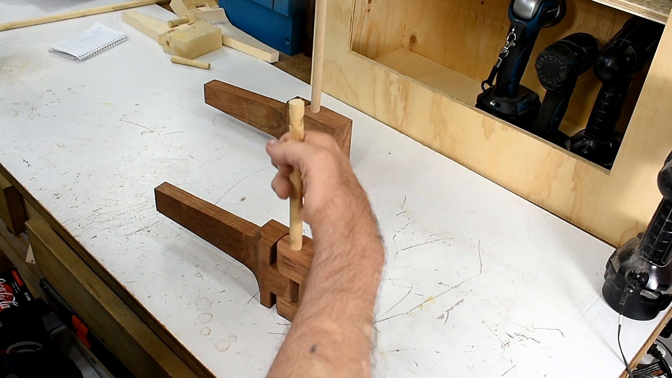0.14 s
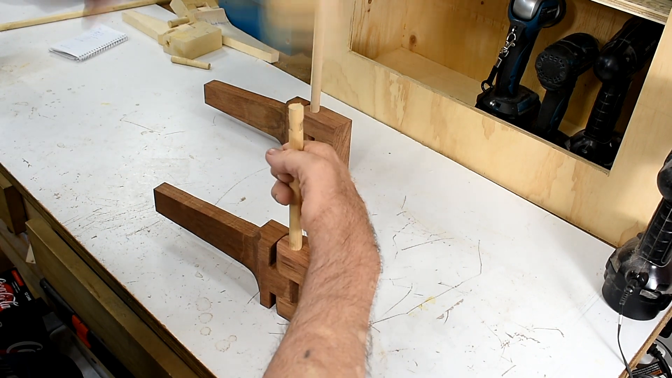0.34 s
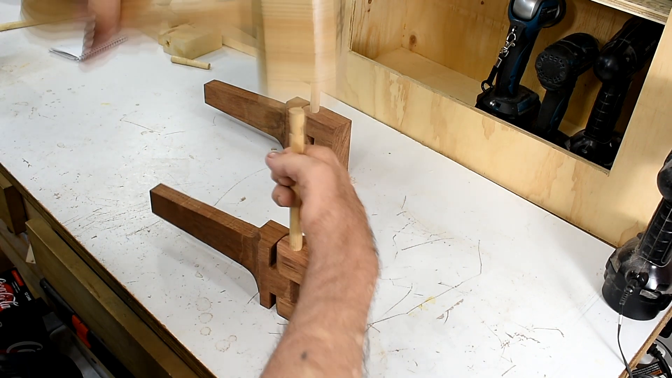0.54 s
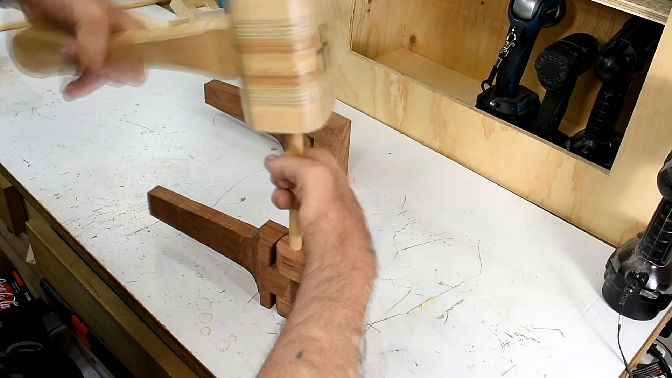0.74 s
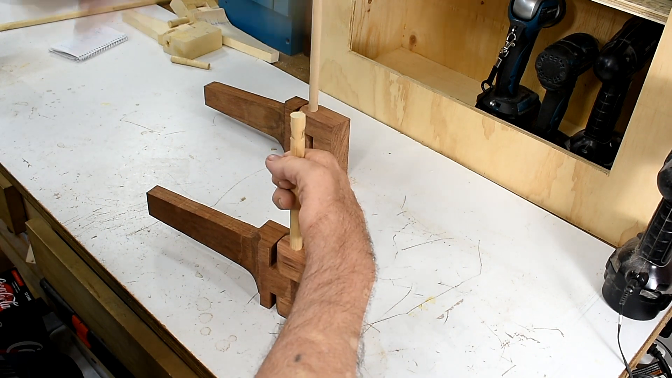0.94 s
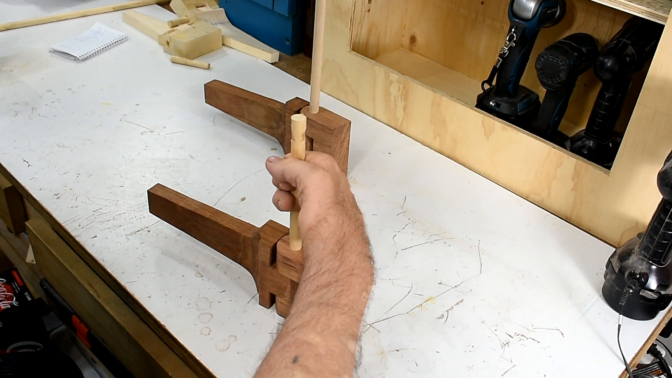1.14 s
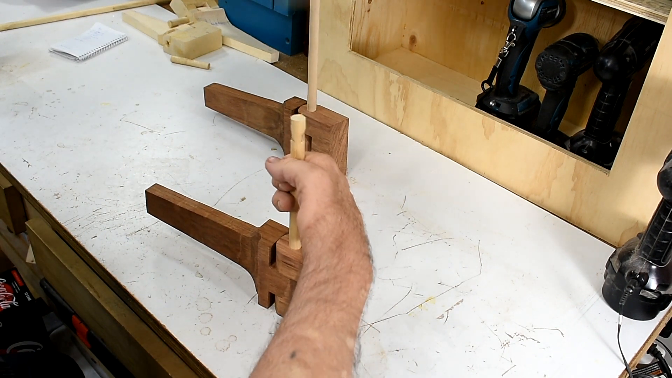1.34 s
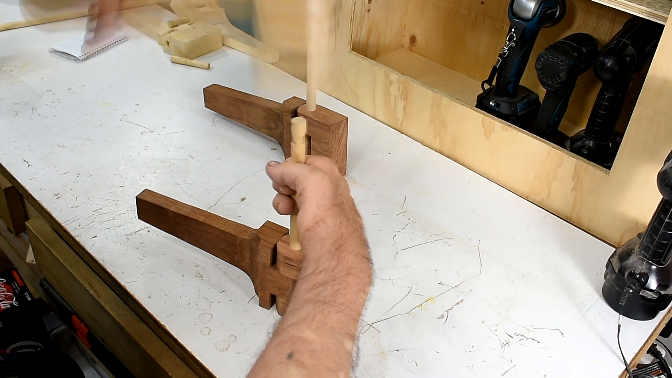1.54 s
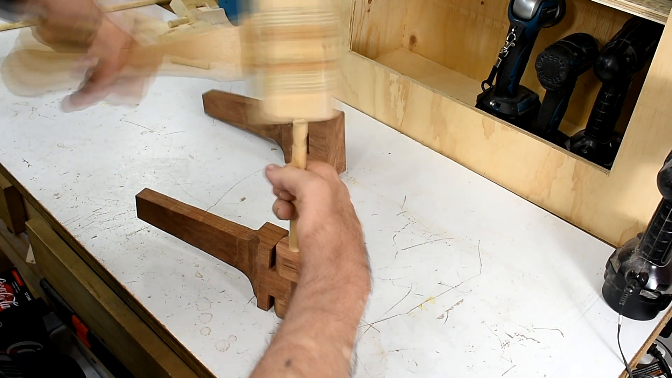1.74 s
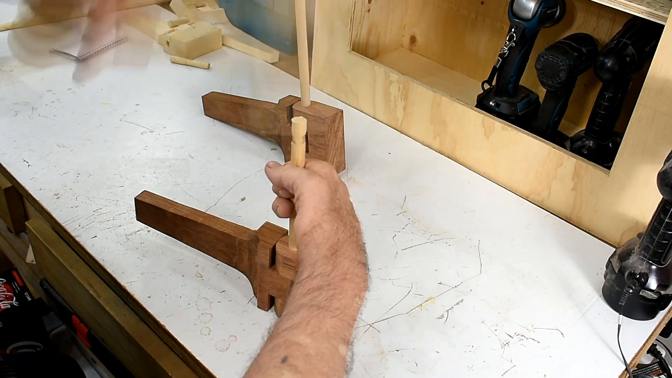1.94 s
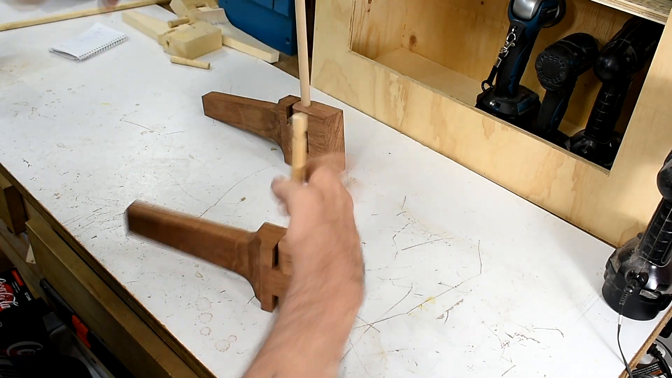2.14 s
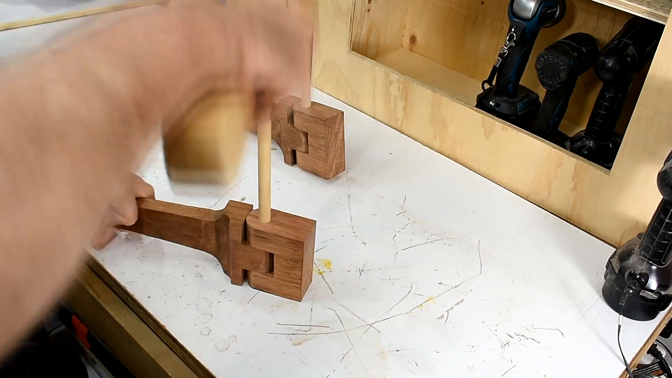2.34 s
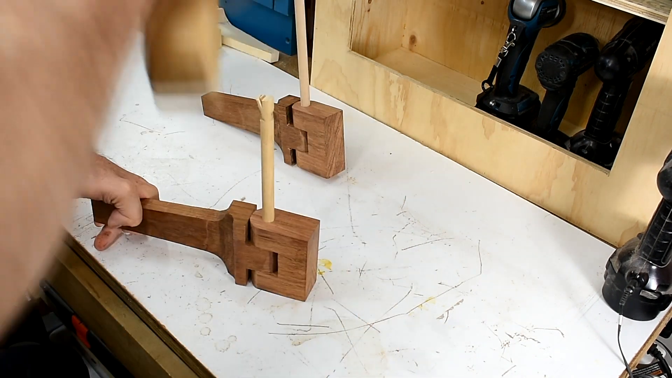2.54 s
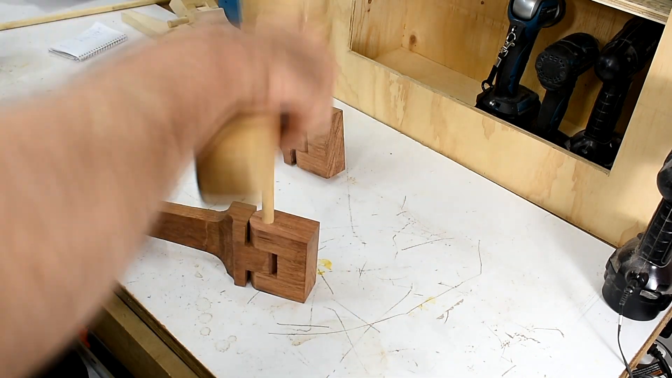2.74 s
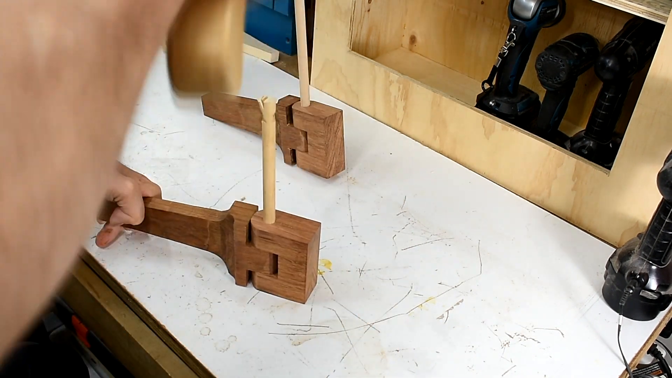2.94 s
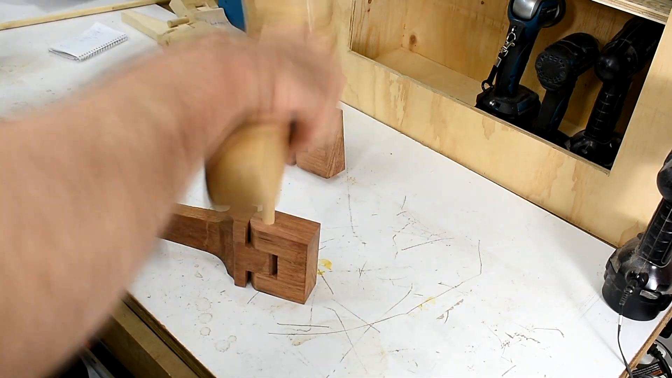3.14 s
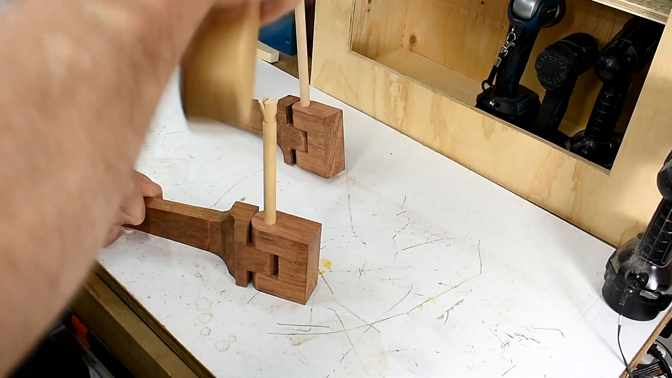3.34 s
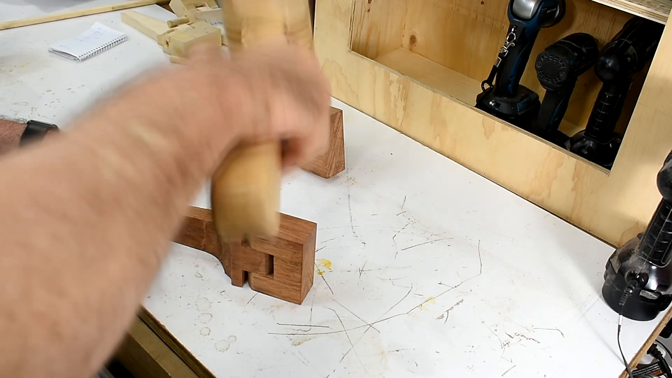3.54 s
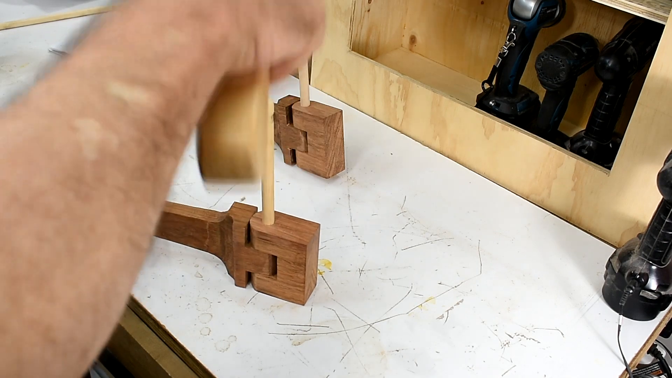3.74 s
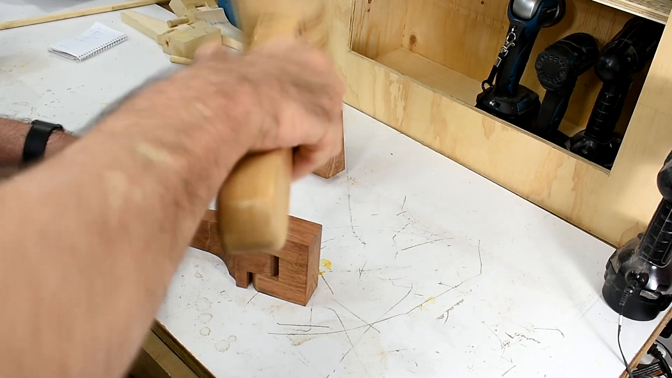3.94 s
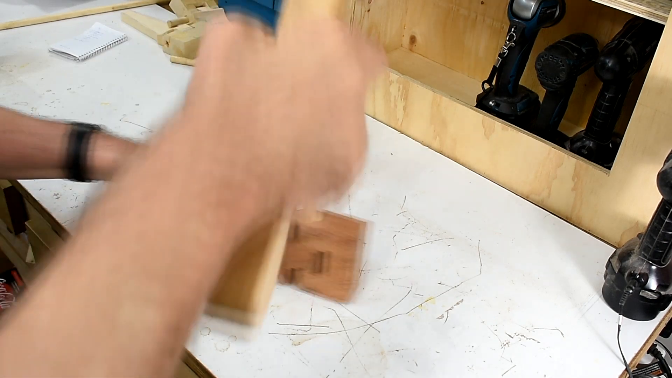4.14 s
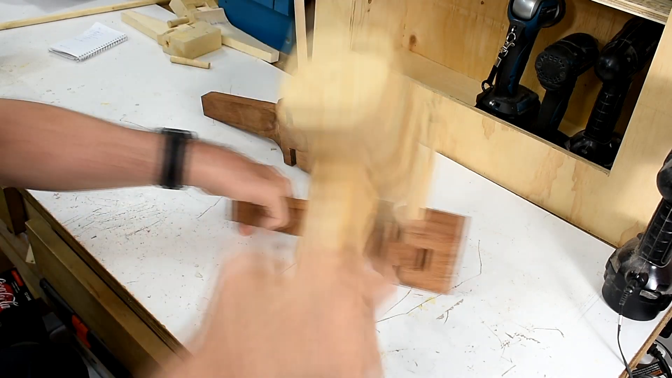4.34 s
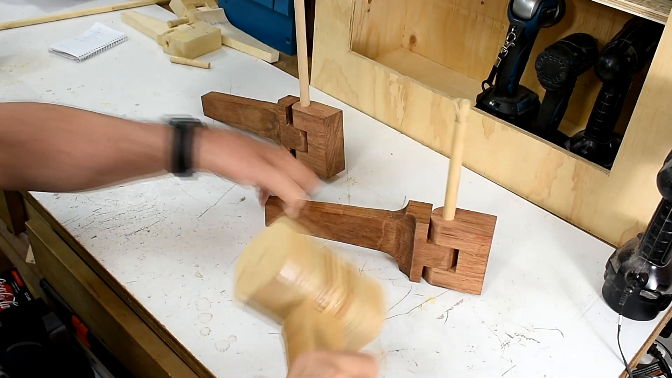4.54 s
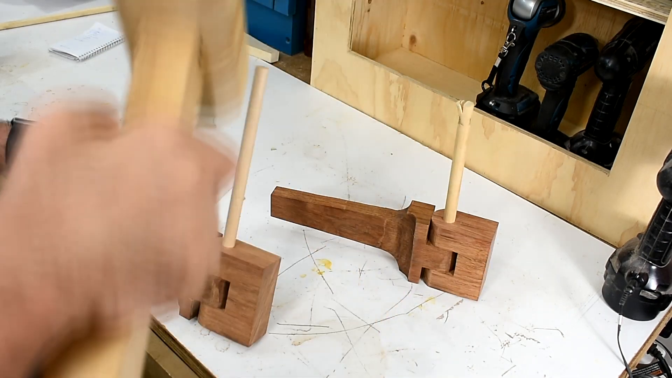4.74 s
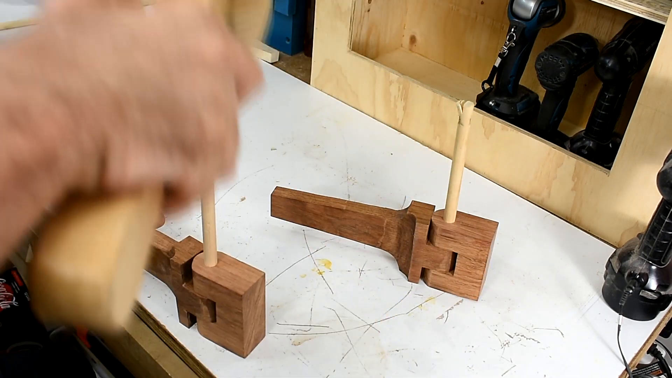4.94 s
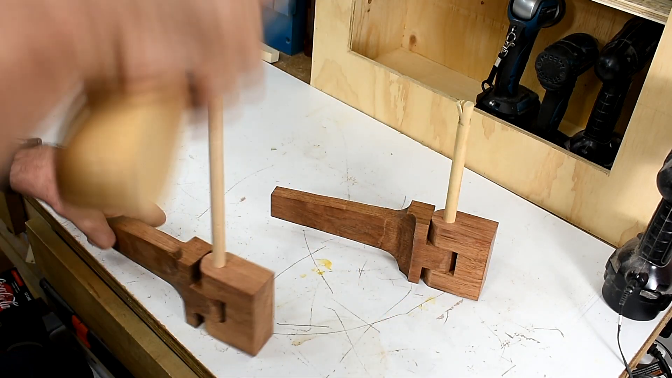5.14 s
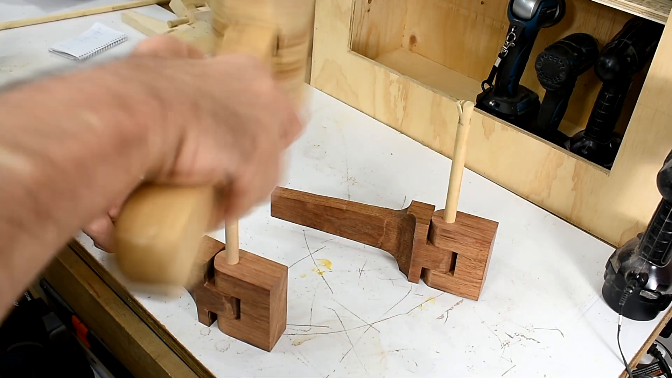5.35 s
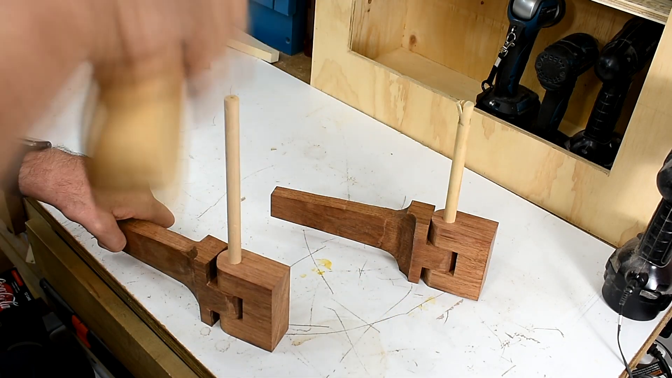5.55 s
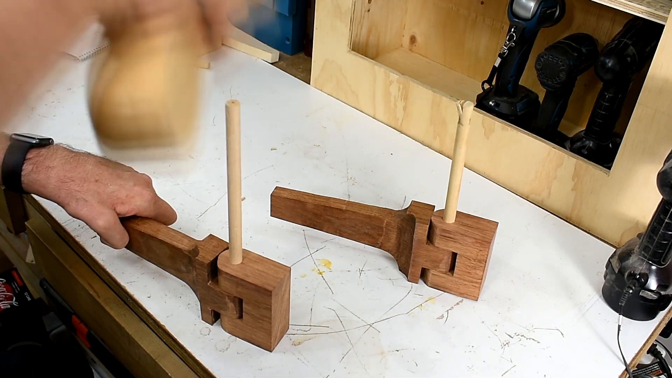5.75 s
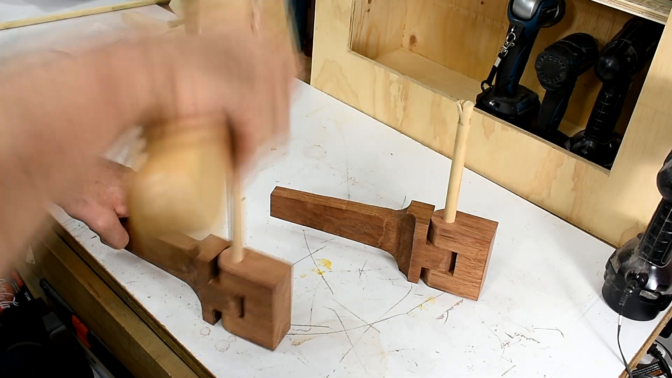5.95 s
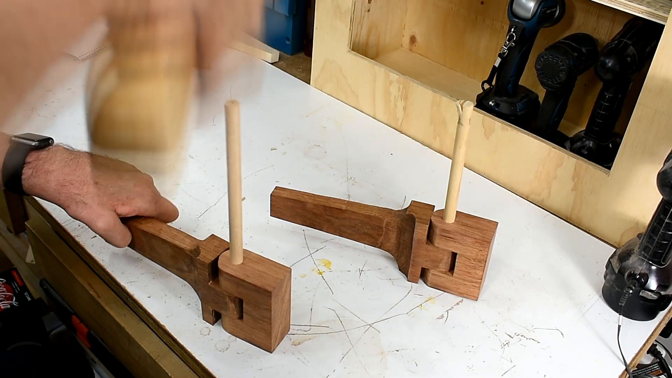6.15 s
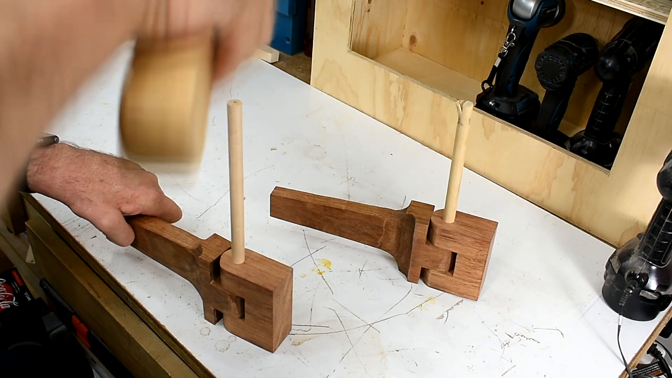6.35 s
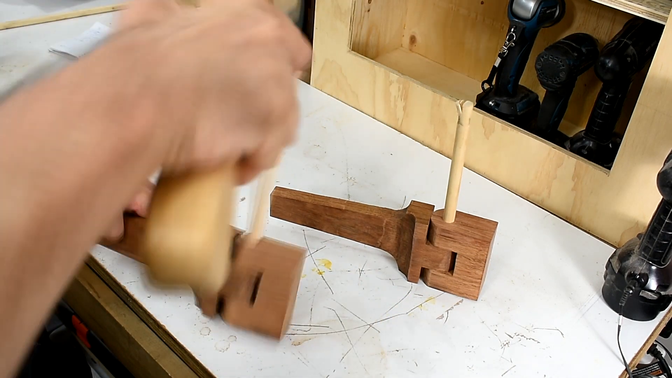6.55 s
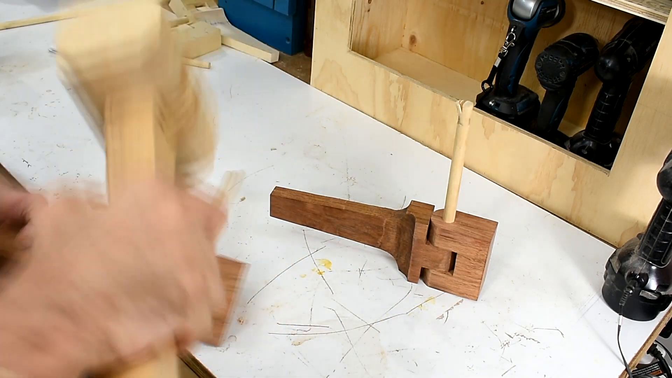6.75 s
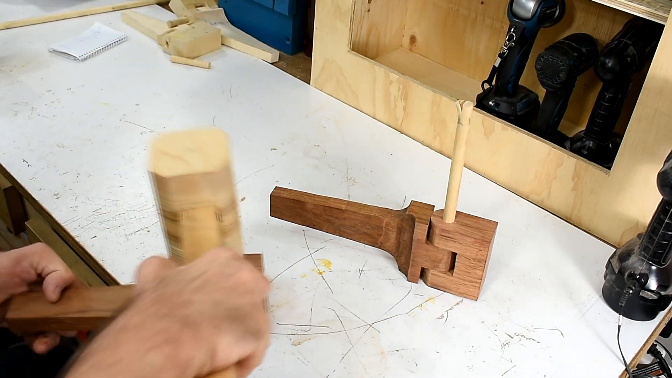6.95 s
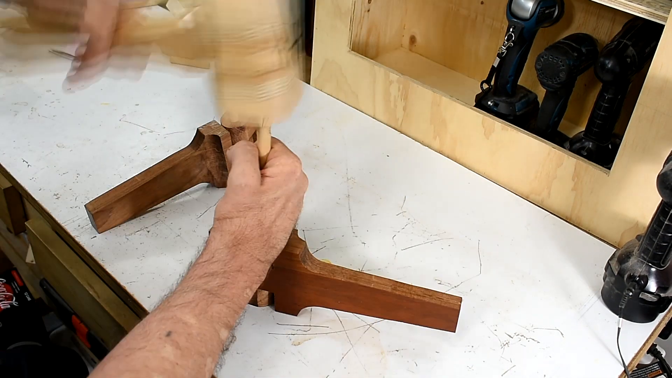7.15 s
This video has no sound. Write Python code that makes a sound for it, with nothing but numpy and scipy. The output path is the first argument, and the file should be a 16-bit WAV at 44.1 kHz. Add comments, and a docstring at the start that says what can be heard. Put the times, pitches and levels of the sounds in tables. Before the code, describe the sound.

Sharp wooden mallet blows come in three quick runs on a workbench, while loose dowels rattle and blocks slide.

```python
"""Three runs of mallet blows in a small workshop: a wooden mallet drives dowels into hardwood blocks on a
workbench. Each blow cracks, rings blocks, bench and room, and overloads a close microphone if loud. In between,
loose dowels rattle and wood is slid over the bench. Room air and a faint hum carry on."""
import sys
import numpy as np
from scipy import signal
from scipy.fft import rfft, irfft
from scipy.io import wavfile
from scipy.ndimage import uniform_filter1d

SR = 44100
rng = np.random.default_rng(int(sys.argv[2]) if len(sys.argv) > 2 else 0)


def log_audio(samples):
    """Write samples as a 16-bit WAV file to the path given in sys.argv[1]."""
    # one column per channel
    frames = np.atleast_2d(samples).T
    # limit to full scale, then quantise
    limited = np.clip(frames, -1, 1)
    pcm = np.round(limited * 32767).astype(np.int16)
    wavfile.write(sys.argv[1], SR, pcm)


N = 317079
RING = int(.6 * SR)  # samples per blow or contact
AGE_S = np.arange(RING) / SR
TIME_S = np.arange(N) / SR


def undb(db):
    """Decibels to gain."""
    return 10 ** (np.asarray(db) / 20)


def unit(x):
    """Scale to rms 1."""
    return x / np.sqrt(np.mean(x ** 2))


def fade(t60_s):
    """Free decay, 60 dB down after t60_s."""
    return np.exp(-np.log(1000) * AGE_S / max(t60_s, 1e-3))


def rise(tau_s):
    """Exponential build-up to 1."""
    return 1 - np.exp(-AGE_S / tau_s)


def bins_hz(x):
    """Frequencies of the spectrum of x."""
    return np.maximum(np.arange(len(x) // 2 + 1) * SR / len(x), 1)


def colour(x, points):
    """Filter by a spectrum of (Hz, dB) points."""
    hz, db = np.transpose(points)
    return irfft(rfft(x) * undb(np.interp(np.log(bins_hz(x)), np.log(hz), db)), len(x))


def noise(count, points):
    """Coloured noise, rms 1."""
    return unit(colour(rng.standard_normal(count), points))


def add(track, start_s, sound):
    """Mix a sound into a track."""
    start = max(int(start_s * SR), 0)
    part = sound[:max(N - start, 0)]
    track[start:start + len(part)] += part


def workshop():
    """Quiet room air, lowest while the hands are still, and a faint steady hum."""
    # Each row: frequency in Hz, rms level in dB.
    hum_tones = [(100, -86.5), (167, -75)]
    # Each row: frequency in Hz, spectral density in dB.
    air_spectrum = [(25, -7.5), (60, -1), (150, -3), (400, -11), (900, -9.5), (1500, -12.5), (3000, -18.5),
                    (5000, -20), (10000, -31), (16000, -44.5)]
    # Each row: time in seconds, level in dB.
    air_levels = [(0, -64), (2.2, -63), (4.6, -65), (4.95, -70), (5.07, -70.5), (5.2, -63), (6.9, -55.5),
                  (7.1, -68), (7.19, -73)]
    hum = sum(np.sqrt(2) * undb(db) * np.sin(2 * np.pi * hz * TIME_S) for hz, db in hum_tones)
    return hum + undb(np.interp(TIME_S, *np.transpose(air_levels))) * noise(N, air_spectrum)


def sliding(gain_db=5, grain_db=1.5):
    """Wood slid over the bench hisses and catches unevenly."""
    # One list per slide. Each point: time in seconds, level in dB.
    slides = [
        [(4.2, -76), (4.254, -58), (4.266, -85), (4.276, -53), (4.334, -56.5), (4.454, -57), (4.54, -82),
         (4.56, -91)],
        [(4.69, -87), (4.704, -80), (4.752, -70), (4.804, -74.5), (4.856, -71), (4.86, -85.5)],
        [(5.14, -85.5), (5.212, -69), (5.222, -71), (5.262, -64), (5.304, -71), (5.32, -77)],
        [(6.85, -73), (6.86, -72), (6.878, -80), (6.932, -58.5), (7.008, -63), (7.06, -84.5)],
    ]
    # Each row: frequency in Hz, level in dB.
    friction_spectrum = [(100, -20), (200, 4), (450, 7), (900, 8), (1600, 8.5), (3000, 3.5), (5000, -0.5),
                         (9000, -2.5), (12000, -6), (16000, -18)]
    effort = sum(np.interp(TIME_S, s, undb(db), left=0, right=0) for s, db in map(np.transpose, slides))
    effort = uniform_filter1d(effort, size=600)
    catch = unit(uniform_filter1d(rng.standard_normal(N), size=300))
    return noise(N, friction_spectrum) * effort * undb(gain_db + grain_db * catch)


def shimmer(depth=.7):
    """Reflections make a ringing mode swell and shift phase at random."""
    slow = uniform_filter1d(rng.standard_normal((RING, 2)) @ [1, 1j], size=600)
    wobble = 1 + depth * slow / np.std(slow)
    return wobble / np.sqrt(1 + depth ** 2)


def rattles(contact_t60_s=.025, room_db=-16, room_t60_s=.33, bounce_db=-6, modes_db=-5, pick_db=9,
            bench_db=-16, bench_t60_s=.15, grip_hz=35):
    """A loose dowel bounces on a block: each contact clicks, rings the dowel and nudges the bench."""
    # Each row: start in seconds, level in dB, chatter in seconds, thud in dB, treble in dB,
    # favoured ring in Hz.
    taps = [ (0.002, -48, 0.023, -5, -2, 2420), (0.222, -36.5, 0.017, -9, -2, 2400),
            (0.4585, -37.5, 0.021, -3, 0, 2180), (0.696, -36.5, .03, -5, -2, 2370),
            (0.9385, -34, .035, -10, -1, 2350), (1.185, -39.5, 0.012, -3, -0.5, 2350),
            (1.195, -37.5, 0.05, -5, 2, 2290), (1.433, -33.5, 0.0019, -5, 2, 2340),
            (1.458, -44, .01, 5, 0, 2410), (1.6605, -40, .03, 3, -1.5, 2350),
            (1.736, -44.5, .005, -3, 0, 2370), (1.924, -39, 0.029, 0, 5.5, 2370),
            (2.26, -39, .002, -3, 1, 3150), (2.294, -49, 0.0082, -3, 2.5, 3170),
            (2.331, -47, .004, 0, 4, 3100), (2.555, -39.5, 0.034, 2, -1, 2350),
            (2.668, -40, 0.0022, -3, -8, 3140), (2.945, -32.5, 0.039, -5, -5.5, 2450),
            (3.3772, -38.5, 0.018, -16, -2.5, 2460), (3.4514, -43, 0.012, -5, -2, 2360),
            (3.7735, -31.5, 0.025, -12, -4.5, 2340), (4.0708, -37.5, 0.0019, -5, 1, 3150),
            (4.2019, -47.5, 0.0042, 13, 1, 3150), (4.291, -37, 0.009, -3, -2, 2300),
            (4.3288, -51, 0.0053, -3, -3, 2380), (4.353, -44.5, 0.0032, -10, -10, 2380),
            (4.4286, -42, 0.0037, -11, -12, 3000), (4.576, -56, 0.0038, 18, -4, 2400),
            (4.6032, -33.5, 0.0043, -9, 2, 3120), (4.633, -45.5, 0.026, -3, -6, 2420),
            (4.7072, -57, 0.002, 6, 6, 3150), (4.790, -60, 0.0096, 19.5, 6.5, 2400),
            (4.834, -62.5, 0.0048, 6, 0, 2420), (4.8732, -42, 0.027, 23.5, 8, 3090),
            (4.95, -49, .008, 6, -5, 3150), (5.0995, -50.5, .008, -9, -3, 3050),
            (5.211, -52, .01, 5, -4, 2350), (5.241, -35, .01, -2.5, -29, 3000),
            (5.274, -40.5, .025, -16, -16, 3100), (5.335, -46, 0.014, -3, -8, 3080),
            (5.3493, -25, 0.0011, -24, -3, 2370), (5.3675, -17, .001, 7.5, 7, 2780),
            (5.4203, -27.5, 0.0021, 3, 1.5, 3130), (5.550, -36.5, .008, -3, -17, 2340),
            (5.578, -37.5, 0.012, -11, -18, 2300), (5.764, -34.5, 0.0059, 0, 3.5, 3100),
            (5.8207, -33.5, 0.016, -7, -7, 2300), (6.1076, -33.5, 0.042, -10, -9, 2450),
            (6.1755, -46.5, .004, -9, -9, 3150), (6.387, -30, 0.027, -9, -8, 2390),
            (6.735, -32.5, 0.0037, 4, -4, 2350), (6.7599, -31, 0.021, 11.5, 6, 2460),
            (6.819, -45, 0.0058, 11, -7, 1510), (6.951, -57, 0.013, 28.5, 0, 2410),
            (7.0052, -42.5, 0.004, 14.5, -18, 2400), (7.156, -52, 0.011, 8, 5.5, 2400)]
    # Lightly held dowel. Each row: frequency in Hz, level in dB, t60 in seconds.
    dowel_modes = [(874, -11, .15), (1480, -7.5, 0.12), (1600, -11, .08), (2080, -7.5, .12),
                   (2290, -6, 0.15), (2425, -7.5, 0.14), (2760, -10.5, 0.13), (3070, -7.5, 0.081),
                   (3165, -8, 0.12)]
    # Contact click and bench thud. Each row: frequency in Hz, level in dB.
    click_spectrum = [(60, -22.5), (180, -13.5), (500, -7), (900, -2), (1500, 3.5), (2300, 4.5),
                      (3200, -0.5), (4000, -6), (6500, -16), (11000, -29), (16000, -41.5)]
    thud_spectrum = [(40, -20), (90, -6), (160, -3.5), (330, -2), (480, -17.5), (1500, -39), (5000, -69.5)]
    out = np.zeros(N)
    mode_hz, mode_db, _ = np.transpose(dowel_modes)
    modes = np.array([np.exp(2j * np.pi * hz * AGE_S) * fade(t60_s) for hz, _, t60_s in dowel_modes])
    for start_s, level_db, chatter_s, thud_db, treble_db, ring_hz in taps:
        # the contact point favours modes near one pitch; the grip shifts them from tap to tap
        dowel = undb(mode_db + pick_db / (1 + ((mode_hz - ring_hz) / 200) ** 2)) @ modes
        dowel *= np.exp(2j * np.pi * grip_hz * rng.standard_normal() * AGE_S)
        tilt = [(3200, .02), (6000, treble_db), (11000, 2.1 * treble_db)]
        bounces_s = chatter_s * (np.arange(3) + rng.uniform(.6, 1, 3)) / 3
        for delay_s, contact_db in [(.0011, 0)] + [(s, bounce_db) for s in bounces_s]:
            click = colour(noise(RING, click_spectrum), tilt)
            click *= fade(contact_t60_s) + undb(room_db) * fade(room_t60_s)
            # a block that lands heavily hardly rings its dowel
            ring = undb(modes_db - .47 * max(thud_db, 0)) * (dowel * shimmer()).real
            thud = noise(RING, thud_spectrum) * fade(bench_t60_s) * rise(.005)
            contact = (click + ring + undb(bench_db + thud_db) * thud) * rise(.00021)
            add(out, start_s + delay_s, undb(level_db + contact_db) * contact)
    return out


def ripple(x, depth_db=3.5, spacing_hz=100):
    """Countless small resonances raise and lower neighbouring frequencies at random."""
    hz = bins_hz(x)
    heights = rng.standard_normal(2000)
    db = depth_db * np.interp(hz / spacing_hz, np.arange(len(heights)), heights) * hz / (hz + 1200)
    return irfft(rfft(x) * undb(db), len(x))


def room_decay(x, t60_s, low_hz=450, high_hz=6000):
    """Three-band decay: the bass builds up late, the treble dies first."""
    spectrum, hz = rfft(x), bins_hz(x)
    low = irfft(spectrum / (1 + (hz / low_hz) ** 4), RING)
    high = irfft(spectrum / (1 + (high_hz / hz) ** 4), RING)
    mid = x - low - high
    return low * fade(.86 * t60_s) * rise(.0039) + mid * fade(t60_s) + high * fade(.65 * t60_s)


def mallet(wash_db=-3, crack_db=2, crack_t60_s=.05, scatter_db=1.5, detune=.004):
    """Each blow: a short crack of head on dowel, then modes and dense ringing of bench and room."""
    # Each row: start in seconds, level in dB, mid-band t60 in seconds, lead-in in seconds, then
    # lead-in, bench thud, block knock and dowel crack in dB.
    blows = [ (0.0515, -17.5, 0.19, .010, -1.5, 0, -0.5, 4.5), (0.2865, -13.5, 0.2, 0.01, -27.5, -1, -2, 9),
             (0.5270, -11.5, 0.19, 0.0086, -6.5, 0.5, -4, 8), (0.7776, -10.5, 0.19, 0.01, -11.5, -2, -3, 8),
             (1.02, -14.5, 0.2, 0.013, -23, 9, 5.5, 12), (1.2725, -7, 0.19, 0.012, -10, 2, 0.5, 4.5),
             (1.51, 1, 0.19, 0.0073, -20.5, -5, -2, 2), (1.7598, -4, 0.22, 0.011, -19.5, -0.5, 0, 3),
             (2.0061, -4, 0.22, 0.011, -20, -1.5, -0.5, 2), (2.3412, -25.5, 0.46, .001, -13, -1, 3, 0.5),
             (2.6946, -4, .37, 0.00089, -24.5, -3.5, 0.5, 2), (3.108, -5, .38, 0.0011, -26, -1.5, 2.5, 2.5),
             (3.5026, -5, 0.37, 0.0015, -27, -1, 3.5, 3), (3.8847, -8, 0.39, 0.0011, -31, 1, 3.5, 3.5),
             (5.3668, -33.5, 0.35, .001, -13, 1, -24, 9.5),
             (5.65, -13.5, 0.29, 0.0066, -5.5, 4.5, 2.5, 9.5), (5.9247, -3, 0.27, 0.0087, -7, -1.5, 0, 2),
             (6.24, -7, 0.26, 0.012, -9, 3, 2, -2.5), (6.4595, -7, 0.29, 0.0073, -6, 0.5, 0, 3),
             (7.1805, -13, .25, 0.0047, -3, 6.5, 2.5, 0)]
    # Blocks, bench and room; each run strikes another spot.
    # Each row: frequency in Hz, then relative level in dB in runs 1, 2 and 3.
    bench_modes = [(101, -6, -7, -10.5), (144, -2, -6, 0), (170.2, -4, -8.5, 0.5), (226.7, -8.5, -3.5, -6),
                   (260.8, -7.5, -0.5, 4), (289, -3, -2, 3), (316, -7, -0.5, 1.5), (348.9, 0.5, 5, 5),
                   (397, -8.5, 1.5, -2), (454.2, -3.5, 0, 2), (558.5, 5.5, 1.5, 1), (621, -5, 0, -9),
                   (710, -17, -6, -20), (749, 2, -6.5, -5), (818.3, -3, -1.5, -6), (873, -3.5, 3, 1.5),
                   (923.6, 1, 3.5, -11.5), (1023, -9, -4, -15), (1088, -10.5, -8, -12),
                   (1138, 1, 2.5, -22.5), (1175, -6.5, -2, -7), (1324, -13, -8, -5.5), (1441, -12, -7, -8),
                   (1550, -5.5, -7.5, -1.5), (2085, -8, -8.5, -4), (2166, -1, -25, -0.5),
                   (2226, -4.5, -11, -4), (2374, -2.5, -6, -5), (2980, -7.5, -7, -9),
                   (3092, -10.5, -11, -1.5)]
    # Starts of runs 2 and 3 in seconds.
    run_starts_s = [2.2, 5]
    # Dense ringing between the modes, and the crack. Each row: frequency in Hz, level in dB.
    wash_spectrum = [(25, -16.5), (60, -11.5), (130, -4), (300, 2.5), (600, 2.5), (950, 0.5), (1400, -1),
                     (1850, -3), (2300, -6), (3200, -5.5), (4000, -11.5), (6300, -15), (10000, -24),
                     (16000, -42)]
    crack_spectrum = [(40, -17.5), (150, -11.5), (550, 1), (1000, 0.5), (1800, 0), (2600, -1.5),
                      (4000, -8.5), (6300, -12), (10000, -22), (16000, -27.5)]
    out = np.zeros(N)
    room = rng.standard_normal(RING)
    mode_hz, *spots_db = np.transpose(bench_modes)
    phase = rng.uniform(0, 2 * np.pi, (len(mode_hz), 1))  # same at every blow
    for start_s, level_db, t60_s, lead_s, lead_db, thud_db, knock_db, bright_db in blows:
        # the dowel's seating decides how much goes into bench, block and dowel
        tone = [(260, thud_db), (560, .0058), (950, knock_db), (1600, knock_db), (2300, bright_db)]
        # the same room answers, a little differently as arm and block move
        answer = room + .8 * rng.standard_normal(RING)
        wash = colour(unit(ripple(colour(answer, wash_spectrum))), tone)
        crack = colour(unit(ripple(noise(RING, crack_spectrum))), tone)
        spot = undb(spots_db[np.searchsorted(run_starts_s, start_s)])
        tone_db = np.interp(mode_hz, *np.transpose(tone)) + scatter_db * rng.standard_normal(len(spot))
        gains = spot / np.sqrt(np.sum(spot ** 2) / 2) * undb(tone_db)
        pitch_hz = mode_hz * (1 + detune * rng.standard_normal(len(spot)))
        modes = gains @ np.sin(2 * np.pi * np.outer(pitch_hz, AGE_S) + phase)
        body = modes * fade(.71 * t60_s) * rise(.0033) + undb(wash_db) * room_decay(wash, t60_s)
        add(out, start_s, undb(level_db) * (body + undb(crack_db) * crack * fade(crack_t60_s)))
        # lead-in: a brief swell leads into the blow
        count = int(np.clip(lead_s * SR, 2, RING))
        swell = crack[-count:] * np.linspace(.25, 1, count)
        add(out, start_s - count / SR, undb(level_db + lead_db) * swell)
    return out


def scene():
    """Everything on and around the bench, in mono."""
    return (mallet() + rattles() + sliding() + workshop())[None]


def record(dry):
    """The microphone flattens the loud blows; a low-pass cuts above 16 kHz."""
    # Each row: time in seconds, overload level in dB.
    overload_levels = [(0, -7), (1.0, -6.5), (1.5, -7.5), (2.1, -5.5), (2.5, -9), (4.2, -7), (5.3, 3),
                       (5.9, -3.5), (7.19, 8)]
    ceiling = undb(np.interp(TIME_S, *np.transpose(overload_levels)))
    clipped = dry / (1 + (dry / ceiling) ** 6) ** (1 / 6)
    return signal.sosfilt(signal.ellip(10, .2, 80, 16000, fs=SR, output="sos"), clipped)


dry = scene()
out = record(dry)
log_audio(out)
```